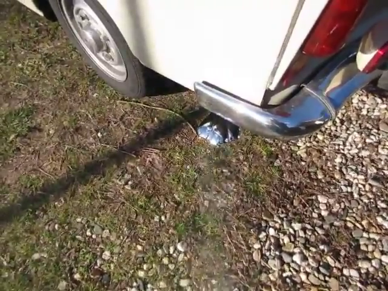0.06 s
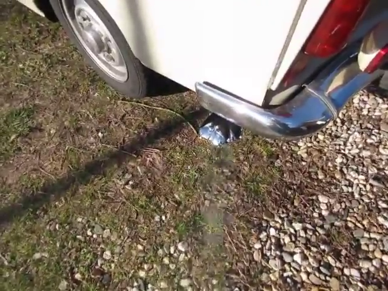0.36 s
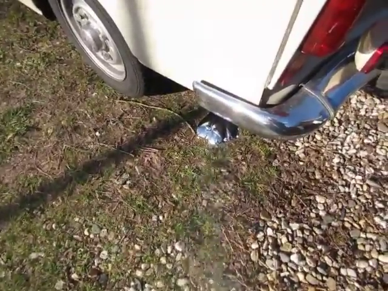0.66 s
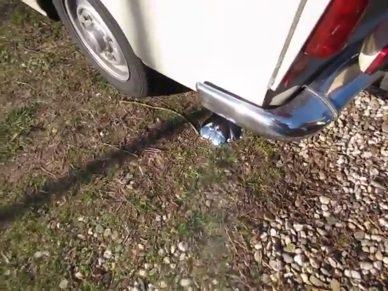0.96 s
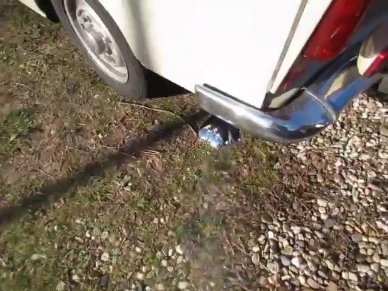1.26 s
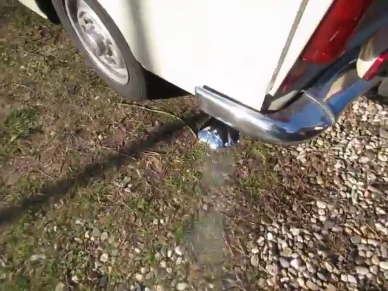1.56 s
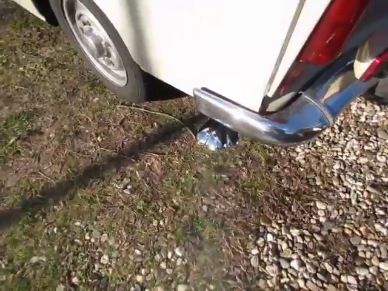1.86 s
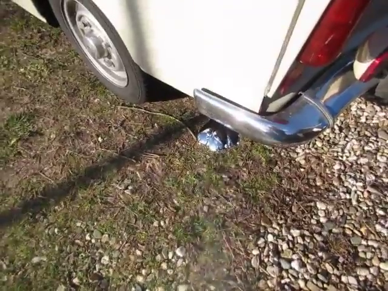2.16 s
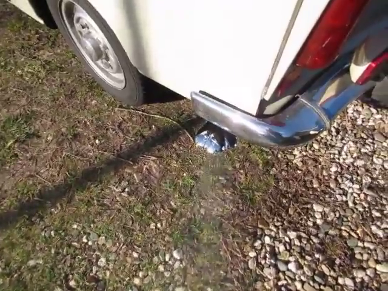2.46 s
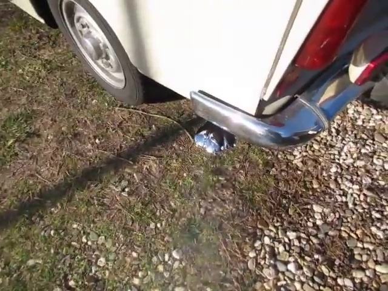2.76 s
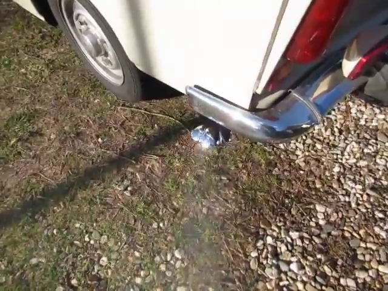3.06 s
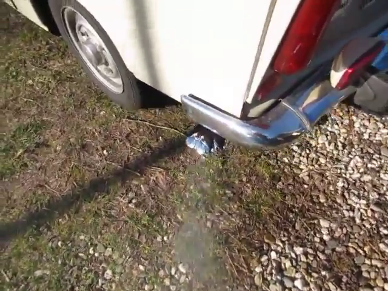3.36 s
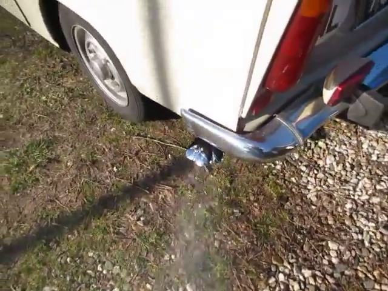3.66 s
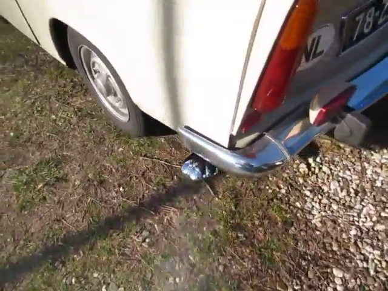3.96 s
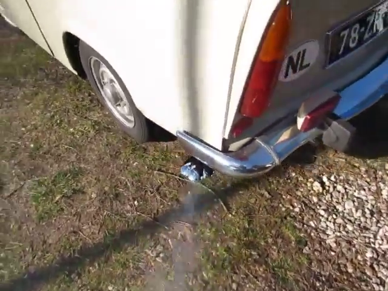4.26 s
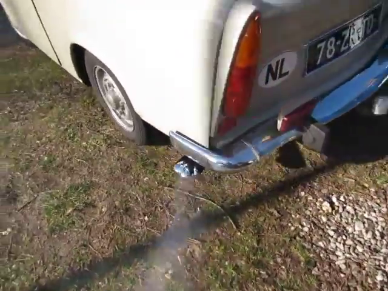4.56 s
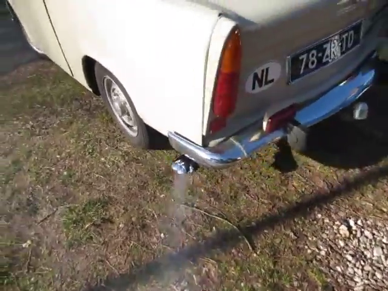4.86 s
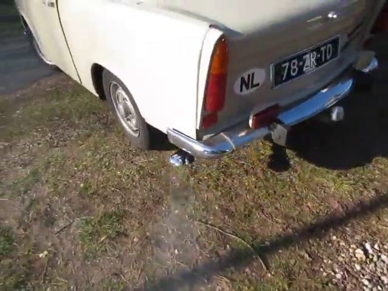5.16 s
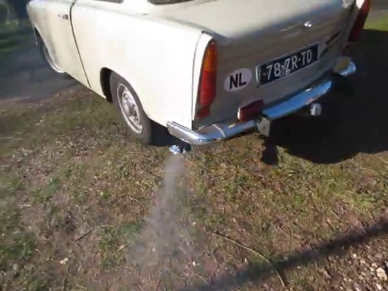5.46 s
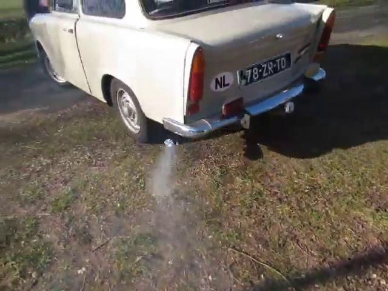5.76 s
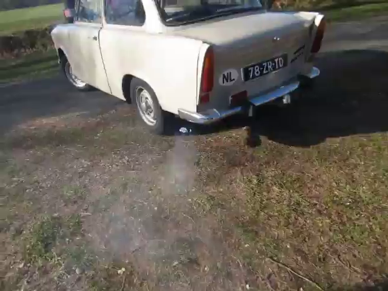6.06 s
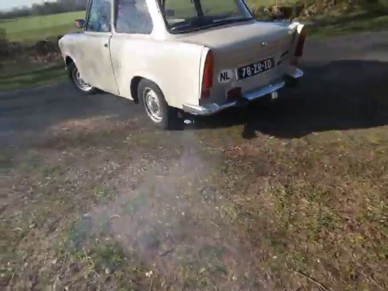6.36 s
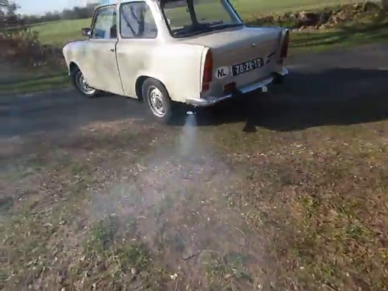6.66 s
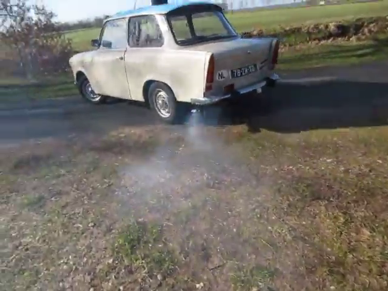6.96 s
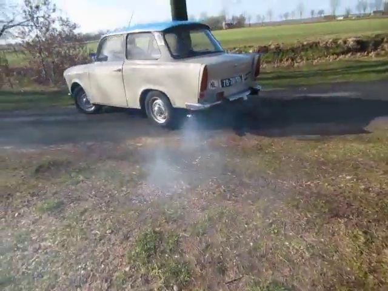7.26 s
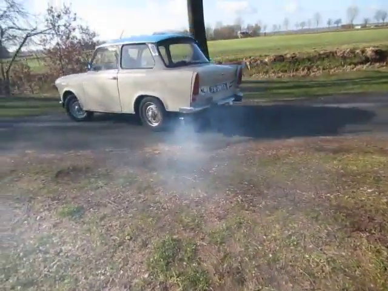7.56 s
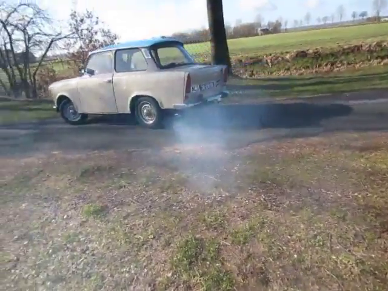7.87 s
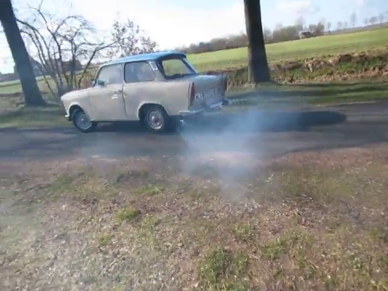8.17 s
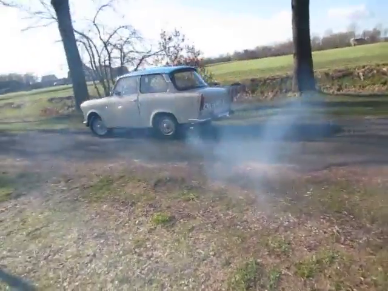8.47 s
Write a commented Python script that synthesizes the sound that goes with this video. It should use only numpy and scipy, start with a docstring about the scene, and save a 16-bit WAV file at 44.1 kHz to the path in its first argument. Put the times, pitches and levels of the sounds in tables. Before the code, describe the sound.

A small two-stroke car idles outdoors with its tailpipe close to the microphone. From the start, sharp, irregular exhaust pops, roughly a dozen a second and often in pairs, spit and bang, each with a short tinny ring from the silencer. Beneath them run a soft, fast throb and a wavering low hum. At about 3.5 seconds the car starts moving, and from 4 to 7 seconds the pops become gradually softer, longer and raspier with distance, while a soft rush of engine and tyres grows. Around 7 seconds the engine revs lightly, rising a little in pitch and becoming fuller and rougher, peaking near 7.5 seconds. It eases slightly but is still popping at the end, around 8.5 seconds. A light breeze gives the microphone occasional low thuds and flutters, most noticeably just after 8 seconds. There is very little echo.

```python
"""Two-stroke car pulling away

A small car idles on grass, tailpipe close to the microphone, then draws off onto a lane.
Every stroke pumps a soft throb out of the pipe, but only some fire: each of those spits, bangs and
rings the silencer. With distance the pops grow longer and raspier. A breeze buffets the microphone."""
import sys
import numpy as np
from scipy import signal
from scipy.io import wavfile
from scipy.ndimage import uniform_filter1d

SR = 44100
rng = np.random.default_rng(int(sys.argv[2]) if len(sys.argv) > 2 else 0)


def bounce(signal):
    """Save signal as a 16-bit WAV file at the path given by the first command-line argument."""
    frames = np.transpose(np.atleast_2d(signal))
    limited = np.clip(frames, -1, 1)
    pcm = np.round(limited * 32767).astype(np.int16)
    wavfile.write(sys.argv[1], SR, pcm)


N = 374850
TIME = np.arange(N) / SR

# how strongly throb, chuff and rasp are heard, with a slight rise in stroke rate:
# (time [s], intensity [0-1])
ENGINE_INTENSITY = [(0, .05), (.9, .2), (1.4, 0), (2.8, .12), (3.7, 0), (4.4, .2), (5.8, .12), (6.9, .4),
                    (7.5, 1), (8.15, .85), (8.5, .45)]
# tailpipe to microphone: (time [s], distance [0 close by, 1 pulling away])
DISTANCE = [(3.9, 0.059), (4.6, 0.27), (6, 0.43), (6.8, 0.82), (7.3, 1), (8.5, .92)]
# the strokes' low throb, their soft chuff across the pipe and silencer modes, and their rasp:
# (frequency [Hz], relative level [dB])
THROB_SPECTRUM = [(15, -22), (30, -2.5), (50, -3.5), (70, -4), (100, -2.5), (135, -6.5), (175, -3.5),
                  (220, -12), (300, -12), (500, -17.5), (2000, -51), (15000, -64)]
CHUFF_SPECTRUM = [(200, -20.5), (300, -2), (355, -11), (410, 12), (465, 2), (545, 8.5), (610, 3),
                  (675, 0.5), (800, -3), (885, -12), (942, 7.5), (1000, -1.5), (1075, 7), (1300, -28.5),
                  (5000, -41), (15000, -39)]
RASP_SPECTRUM = [(200, 5.5), (800, 5.5), (1400, 7), (2200, 4.5), (3000, -3), (4000, -9), (6000, -12.5),
                 (9000, -19), (15000, -40)]
# lowest standing waves of the exhaust: (frequency [Hz], width [Hz], height [dB])
STANDING_WAVES = [(136, 25, -0.5), (174.4, 10, 7.5)]
# the pipe's low hum: (time [s], level [dB])
DRONE_LEVEL = [(.08, -27), (.2, -37.5), (.95, -34), (1.5, -48), (2.3, -41.5), (2.9, -34), (3.9, -42),
               (6.6, -41), (7.2, -32.5), (8.5, -33)]
# firings that bang in the exhaust: (time [s], strength [dB], silencer ring [dB])
FIRINGS = [(.102, -19, -20.5), (0.162, -14.5, -12.5), (.267, -15.5, -23), (0.457, -18.5, -19.5),
           (0.475, -14.5, -15), (0.674, -17.5, -19), (0.835, -13.5, -18.5), (.933, -14.5, -15),
           (.993, -14.5, -19.5), (1.153, -14, -15.5), (1.17, -14.5, -18), (1.307, -19, -21.5),
           (1.403, -18, -18), (1.458, -17.5, -21.5), (1.645, -19.5, -26), (1.664, -16.5, -17),
           (1.793, -15.5, -17), (1.888, -15, -13.5), (1.945, -16, -21), (2.134, -17.5, -25.5),
           (2.153, -14.5, -16.5), (2.279, -15, -17), (2.373, -17, -13), (2.427, -16.5, -23),
           (2.57, -15.5, -27), (2.586, -15.5, -18.5), (2.67, -20.5, -22), (2.757, -21, -17),
           (2.769, -15, -29), (2.874, -29, -30), (2.91, -22, -28), (2.926, -15.5, -21.5),
           (3.012, -16.5, -18), (3.103, -18.5, -16), (3.154, -18.5, -23.5), (3.261, -16.5, -21.5),
           (3.278, -15.5, -14.5), (3.369, -17, -17.5), (3.42, -16.5, -12.5), (3.475, -20, -22.5),
           (3.565, -22.5, -20), (3.585, -20.5, -32), (3.696, -21.5, -26.5), (3.715, -18, -21),
           (3.768, -20.5, -23), (3.844, -20.5, -20.5), (3.862, -18, -19), (3.952, -20.5, -23),
           (4.008, -20, -22), (4.064, -18, -25.5), (4.139, -19, -18), (4.157, -17.5, -26.5),
           (4.251, -21.5, -26), (4.308, -17, -21.5), (4.368, -24, -32), (4.446, -21.5, -24.5),
           (4.467, -20, -31), (4.523, -17.5, -21), (4.604, -17.5, -21.5), (4.625, -22, -24.5),
           (4.686, -19.5, -24.5), (4.748, -17.5, -18), (4.855, -25, -26.5), (4.876, -20.5, -21.5),
           (4.938, -21, -22.5), (4.999, -17, -14), (5.017, -20.5, -37), (5.104, -23.5, -24.5),
           (5.124, -22.5, -18), (5.186, -24.5, -23), (5.269, -24, -23), (5.29, -22.5, -18.5),
           (5.352, -20.5, -19.5), (5.415, -18, -13.5), (5.523, -31, -31), (5.544, -23.5, -21.5),
           (5.674, -20, -15), (5.744, -28.5, -27.5), (5.815, -24, -21.5), (5.829, -26, -23),
           (5.924, -27, -30), (5.946, -22, -22.5), (6.012, -20.5, -26), (6.078, -22.5, -20),
           (6.094, -24, -41), (6.186, -26.5, -38), (6.207, -21, -26), (6.319, -25.5, -34),
           (6.338, -20.5, -24.5), (6.403, -23, -34), (6.471, -19, -26.5), (6.589, -24.5, -37),
           (6.604, -23, -27.5), (6.706, -25.5, -32), (6.725, -16.5, -22.5), (6.785, -21.5, -41),
           (6.887, -21, -29), (6.905, -18.5, -34), (7.018, -19.5, -33), (7.035, -19, -27),
           (7.125, -20, -29.5), (7.179, -19, -27), (7.231, -17, -30), (7.315, -19, -36),
           (7.328, -26, -24.5), (7.37, -18.5, -30), (7.462, -20, -30), (7.517, -20, -31),
           (7.609, -19.5, -34), (7.667, -19.5, -35), (7.762, -18, -32), (7.782, -18, -32),
           (7.899, -22, -38), (7.919, -18.5, -25.5), (8.018, -22.5, -37), (8.03, -25.5, -30),
           (8.085, -17, -29), (8.147, -18, -25.5), (8.253, -21, -23), (8.273, -18.5, -23),
           (8.397, -24, -29), (8.42, -25, -25.5)]
# a pop heard close by and from afar: (frequency [Hz], relative level [dB])
NEAR_POP_SPECTRUM = [(100, -16.5), (400, 8.5), (800, 1.5), (1300, -2), (2000, -4.5), (3000, -2),
                     (3600, -11.5), (5000, -17.5), (8000, -17), (11000, -23), (15000, -30)]
FAR_POP_SPECTRUM = [(100, -43), (400, 12), (800, -11.5), (1300, 6), (2200, -1.5), (3100, 6.5), (4000, -9),
                    (5000, -8.5), (8000, -6), (11000, -11.5), (15000, -16)]
# resonances of the tailpipe tip, close by: (frequency [Hz], width [Hz], height [dB])
TIP_PEAKS = [(1413, 35, 11.5), (1507, 19, 12.5), (1895, 76, 15), (2112, 136, 9), (2201, 177, 9.5),
             (2410, 215, 12), (2667, 58, 6.5), (3355, 140, 7.5), (3986, 360, 13), (4680, 560, 9.5),
             (5690, 470, 7.5), (6400, 360, 6), (7070, 150, 7.5)]
# modes of the silencer can and the air in the pipe: (frequency [Hz], relative level [dB], t60 [s])
SILENCER_MODES = [(949.4, 1.5, 0.13), (1021.6, 1.5, 0.053), (1077.3, -9.5, 0.14), (1140, -12.5, 0.13)]
PIPE_MODES = [(132, -1.5, 0.12), (177.3, -9, 0.19), (411.1, -1.5, 0.18), (497.2, -2, 0.1),
              (544.2, -0.5, 0.11), (590, -3, 0.02), (666.7, -7, 0.15)]
# buffets on the microphone: (time [s], relative level [dB], half-length [s])
BUFFETS = [(.5, -14.5, 0.087), (0.571, -11, 0.0087), (0.777, -24.5, .14), (1.148, -11, 0.017),
           (1.319, -22.5, .05), (3.271, -18, 0.028), (4.388, -20.5, 0.063), (4.849, -14.5, 0.089),
           (6.365, -16, 0.049), (6.413, -9, 0.025), (6.512, -11, 0.019), (6.907, -12, .03),
           (6.98, -21.5, 0.031), (7.159, -13, 0.029), (8.046, -12, 0.067), (8.212, -17, 0.14),
           (8.322, -2, 0.0093), (8.337, -2.5, 0.0087), (8.433, -7, 0.033)]
# wind at the microphone: (frequency [Hz], relative level [dB])
WIND_SPECTRUM = [(20, -30), (50, -34), (100, 3), (170, -1.5), (280, -5), (420, -10.5), (700, -18),
                 (1500, -55), (6000, -69)]
# wide rush of the engine and the tyres: (frequency [Hz], relative level [dB])
RUSH_SPECTRUM = [(200, -5), (400, 15), (560, 5.5), (800, -5), (1400, -0.5), (2400, -3), (4000, -11.5),
                 (8000, -16.5), (12000, -19), (15000, -54)]

IDLE_HZ, RISE_HZ = 48.93, 7  # stroke rate, and what full intensity adds
ROLL_START_S, ROLL_TAKES_S = 3.47, .4  # the car gets moving
LEAK_SAMPLES = 700  # gas leaks ahead of each bang


def amp(db):
    """Decibels to gain."""
    return 10 ** (np.asarray(db) / 20)


def unit_rms(x):
    """Scales to rms 1."""
    return x / np.sqrt(np.mean(x ** 2) + 1e-20)


def wander(samples):
    """Slow random drift of rms 1: noise averaged over this many samples."""
    return unit_rms(uniform_filter1d(rng.standard_normal(N), samples))


def curve(rows):
    """A control curve at every sample."""
    return np.interp(TIME, *np.transpose(rows))


def add(mix, s, sound):
    """Lays a sound into the mix at time s."""
    part = mix[max(round(s * SR), 0):][:len(sound)]
    part += sound[:len(part)]


def colour(x, spectrum, peaks=(), size=4096):
    """Minimum-phase filter of unit energy from a smooth spectrum and resonance peaks."""
    hz = abs(np.fft.fftfreq(size, 1 / SR))
    knots_hz, level = np.transpose(spectrum)
    db = np.interp(np.log(hz + 1), np.log(knots_hz), level)
    for centre, width, height in peaks:
        db = db + height / (1 + (2 * (hz - centre) / width) ** 2)
    log_response = np.conj(signal.hilbert(np.log(amp(db))))
    impulse = np.fft.ifft(np.exp(log_response)).real
    return signal.oaconvolve(x, impulse / np.linalg.norm(impulse))[:N]


def piston_strokes():
    """Fired or not, every stroke pushes out a throb, a chuff and a rasp; they swell and dip together."""
    intensity = curve(ENGINE_INTENSITY)
    stroke_hz = (IDLE_HZ + RISE_HZ * intensity) * (1 + 0.05 * wander(2000))
    turns = np.cumsum(stroke_hz) / SR
    stroke = turns.astype(int)
    strength = amp(2.33 * rng.standard_normal(1024))[stroke]
    kicks = np.diff(stroke, prepend=0) * strength
    flow = strength * (4.4 + np.exp(-(turns % 1) / 0.45))
    throb_noise, chuff_noise, rasp_noise = rng.standard_normal((3, N))
    pulses = unit_rms(kicks) + 1.5 * unit_rms(flow * throb_noise)
    throb = unit_rms(colour(pulses, THROB_SPECTRUM, STANDING_WAVES, size=16384))
    chuff = unit_rms(colour(flow * chuff_noise, CHUFF_SPECTRUM))
    rasp = unit_rms(colour((flow + 0.2) * rasp_noise, RASP_SPECTRUM))
    return (amp(-33 + 7 * intensity) * throb
            + amp(-34 + 5 * intensity) * chuff
            + amp(-42.5 + 13.5 * intensity) * rasp)


def pipe_drone(hz=134.8):
    """The pipe's lowest standing wave: a nearly pure note that wavers with the uneven running."""
    sway, swell = wander(2600), wander(2600)
    turns = np.cumsum(hz * (1 + 0.0239 * sway)) / SR
    return amp(curve(DRONE_LEVEL) + 2.1 * swell) * np.sqrt(2) * np.sin(2 * np.pi * turns)


def gas_blast(far, size=4000):
    """Gas spits as the port opens, bursts out with a shock front, then dies away."""
    t = (np.arange(size) - LEAK_SAMPLES) / SR
    before, after = np.minimum(t, 0), np.maximum(t, 0)
    leak, jet, fronts = rng.standard_normal((3, size))
    mid_band = signal.butter(2, [1500, 3600], "band", fs=SR, output="sos")
    rasp = unit_rms(signal.sosfilt(mid_band, leak))
    spit = rasp * amp(-16.5 - 2 * far) * np.exp(-((t + 0.0051) / 0.0034) ** 2)
    # spent gas trails off duller than the burst itself
    spent = unit_rms(signal.lfilter(*signal.butter(1, 5000, fs=SR), leak))
    tail = spent * (t >= 0) * amp(-14 + 9.2 * far) * np.exp(-after / (0.0096 + 0.0061 * far))
    # close to the microphone the burst is abrupt; farther off it swells and lasts
    rise_s, decay_s = 0.0019 + 0.0012 * far ** 2, 0.007 + 0.0045 * far
    burst = np.exp(before / rise_s - after / decay_s)
    shocks = amp(11 - 8.9 * far) * fronts * (rng.random(size) < 600 / SR) * burst
    shocks[LEAK_SAMPLES] += amp(8 - 13 * far ** 2)
    pop = spit + tail + burst * jet + shocks
    bang = pop[LEAK_SAMPLES:][:size // 11]
    return pop / np.sqrt(np.mean(bang ** 2))


def tailpipe_pops():
    """Each blast leaves through the tip, whose resonances waver with gas heat and blur with distance."""
    out, distance = np.zeros(N), curve(DISTANCE)
    hz, near_db = np.transpose(NEAR_POP_SPECTRUM)
    far_db = np.interp(hz, *np.transpose(FAR_POP_SPECTRUM))
    treble = np.clip(np.log2(hz / 2700) / 1.45, 0, 1)
    for s, db, ring_db in FIRINGS:
        far = distance[round(s * SR)]
        rolling = np.clip((s - ROLL_START_S) / ROLL_TAKES_S, 0, 1)
        snap_db = 2 - 4 * rolling + 2.2 * rng.standard_normal()
        snap_db += 0.7 * max(ring_db - db, 0)  # a steep front both rings the silencer and snaps
        spectrum = np.transpose([hz, (1 - far) * near_db + far * far_db + snap_db * treble])
        peaks = []
        for centre, width, height in TIP_PEAKS:
            detune, lift = 1 + rng.normal(0, [0.0081, 0.25])
            peaks.append((centre * detune, width, height * (1 - 0.58 * far) * lift))
        bark = (2410 - 410 * far, 450, 2.5)  # sinks as the car moves off
        metallic_edge = (4300, 800, 0.62 * max(snap_db, 0))
        pop = colour(gas_blast(far), spectrum, peaks + [bark, metallic_edge], size=2048)
        add(out, s - LEAK_SAMPLES / SR, amp(db - 2.09) * pop)
    return out


def ring(modes, scatter, size=8000, onset_samples=550):
    """One blow on a set of modes, rms 1 at first; gas heat and blow shape vary each time."""
    t = np.arange(size) / SR
    hz, db, t60 = np.transpose(modes)[:, :, None]
    detune, strength = rng.standard_normal((2, len(modes), 1))
    phase = 1.23 * rng.standard_normal((len(modes), 1))
    envelopes = amp(db + 2.45 * strength - 60 * t / t60)
    tones = np.sin(2 * np.pi * hz * (1 + scatter * detune) * t + phase)
    sound = (envelopes * tones).sum(0) * (1 - np.exp(-t / 0.0021))
    return sound / np.sqrt(np.mean(sound[:onset_samples] ** 2))


def exhaust_ringing():
    """Each firing rings the silencer can and the air in the pipe; pitches scatter more with distance."""
    out, distance = np.zeros(N), curve(DISTANCE)
    for s, db, ring_db in FIRINGS:
        far = distance[round(s * SR)]
        boom_db = db - 5.5 + 3.5 * far
        add(out, s - .0008, amp(ring_db) * ring(SILENCER_MODES, scatter=0.0081 + 0.0383 * far ** 2))
        add(out, s - .001, amp(boom_db) * ring(PIPE_MODES, scatter=0.014 + 0.029 * far ** 2))
    return out


def outdoor_echoes(x, t60_s=0.099, size=9000):
    """Faint scatter from ground, bodywork and trees, stronger as the car draws off."""
    t = np.arange(size) / SR
    taps = rng.standard_normal(size) * (rng.random(size) < 2000 / SR)
    taps *= (t > .004) * amp(-60 * t / t60_s)
    send = amp(-11 + 3.3 * curve(DISTANCE))
    return signal.oaconvolve(x * send, taps / np.linalg.norm(taps))[:N]


def wind_buffets():
    """Eddies strike the microphone as short low thuds and longer flutters."""
    air, out = colour(rng.standard_normal(N), WIND_SPECTRUM), np.zeros(N)
    for s, db, half_s in BUFFETS:
        size = int(2 * half_s * SR)
        eddy = air[rng.integers(N - size):][:size] * signal.windows.hann(size)
        add(out, s - half_s, amp(db - 9) * unit_rms(eddy))
    return out


def driving_rush():
    """A soft, slightly unsteady roar of engine and tyres grows as the car makes for the lane."""
    gain = amp(-35.5 + 0.59 * wander(1500)) * curve(DISTANCE)
    return gain * unit_rms(colour(rng.standard_normal(N), RUSH_SPECTRUM))


def scene():
    """Car, surroundings and breeze, heard in mono from one spot on the grass."""
    exhaust = tailpipe_pops() + exhaust_ringing()
    car = exhaust + outdoor_echoes(exhaust) + piston_strokes() + pipe_drone() + driving_rush()
    return (car + wind_buffets())[None]


def record(dry, low_hz=33, high_hz=15150):
    """A small camera's microphone: bass roll-off, full-scale limit and band limit."""
    bass_cut = signal.lfilter(*signal.butter(2, low_hz, "high", fs=SR), dry)
    band_limit = signal.firwin(401, high_hz, window=("kaiser", 9), fs=SR)
    return signal.oaconvolve(np.clip(bass_cut, -1, 1), band_limit[None], "same")


dry = scene()
out = record(dry)
bounce(out)
```